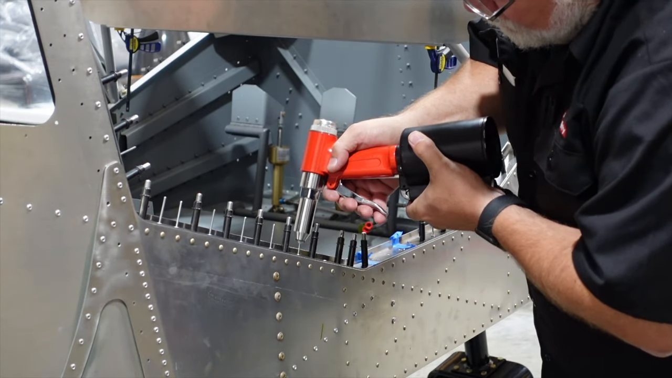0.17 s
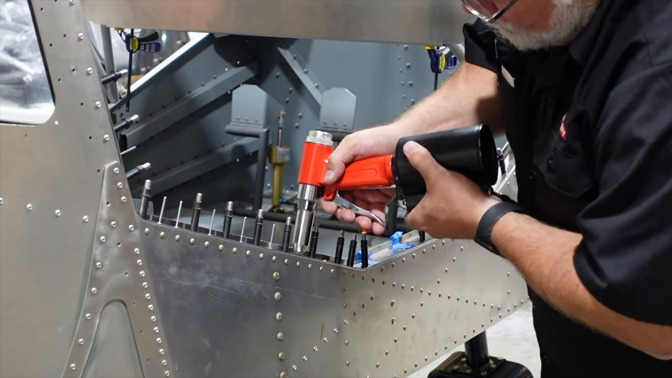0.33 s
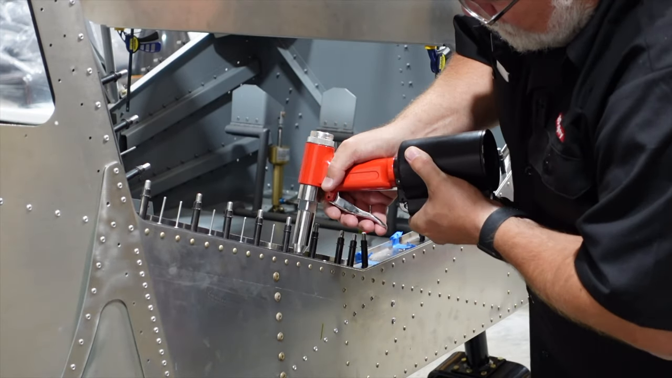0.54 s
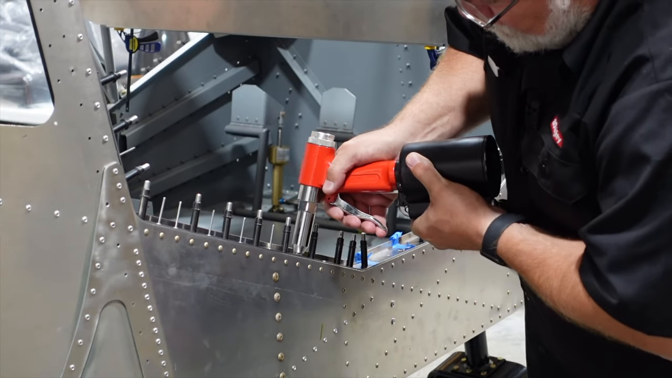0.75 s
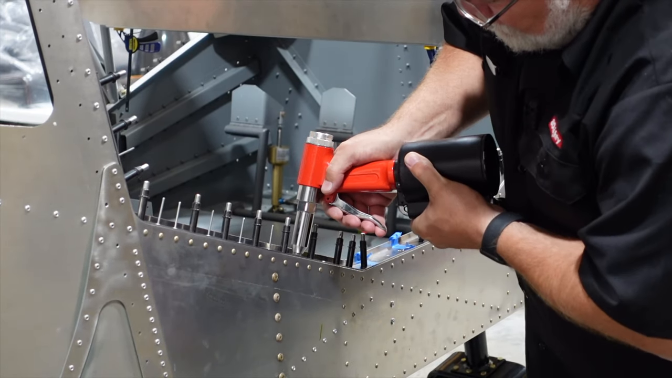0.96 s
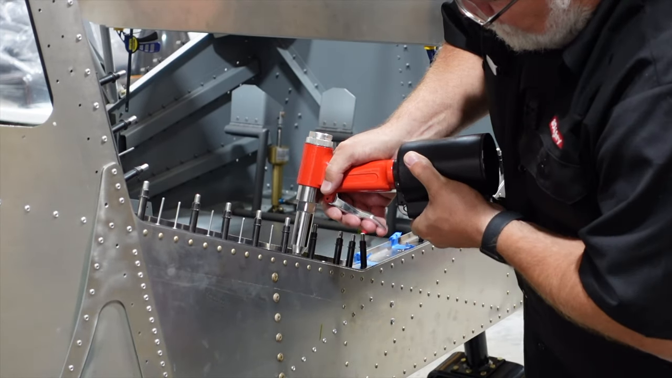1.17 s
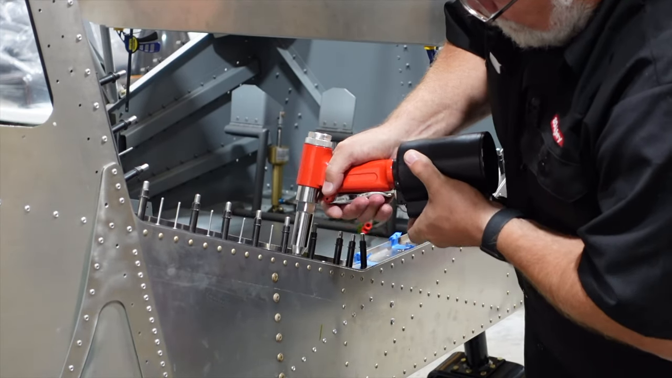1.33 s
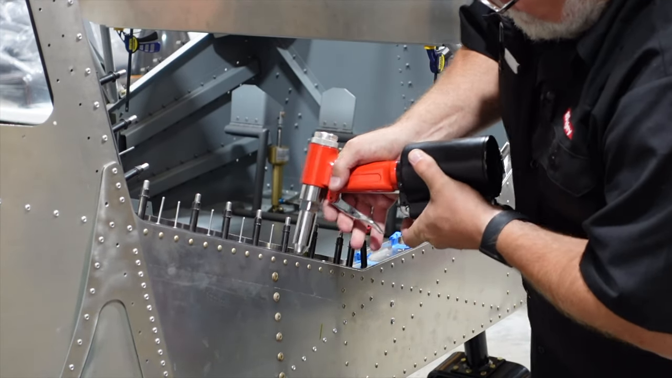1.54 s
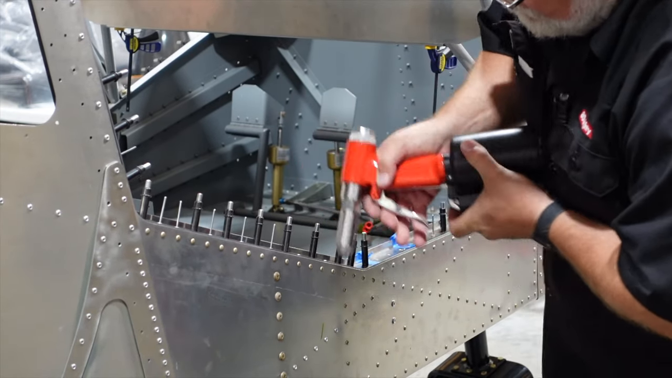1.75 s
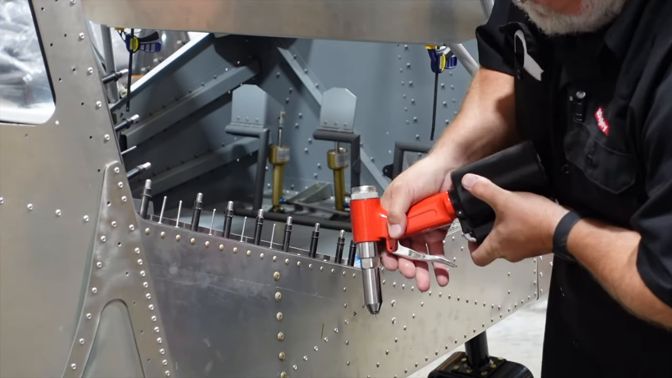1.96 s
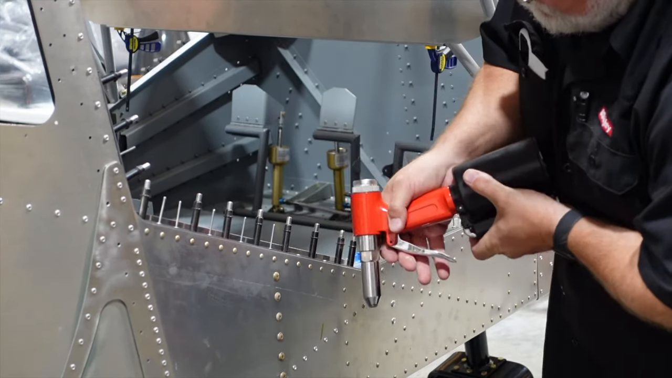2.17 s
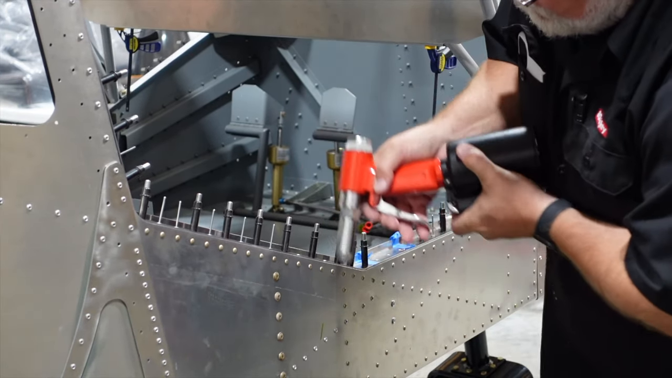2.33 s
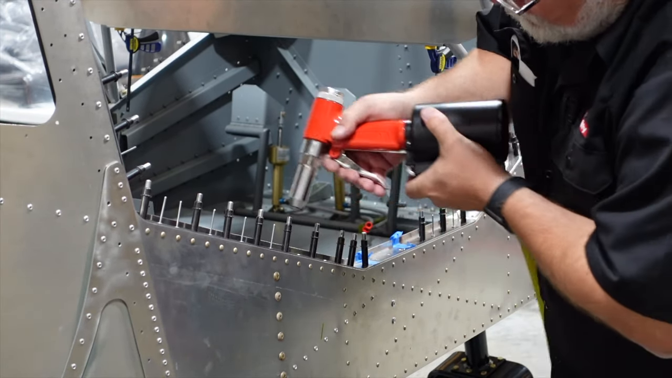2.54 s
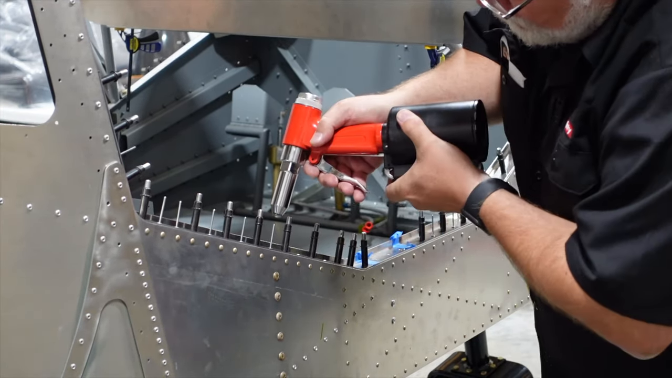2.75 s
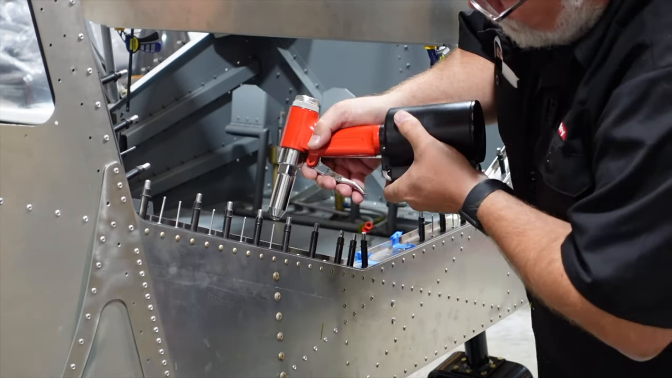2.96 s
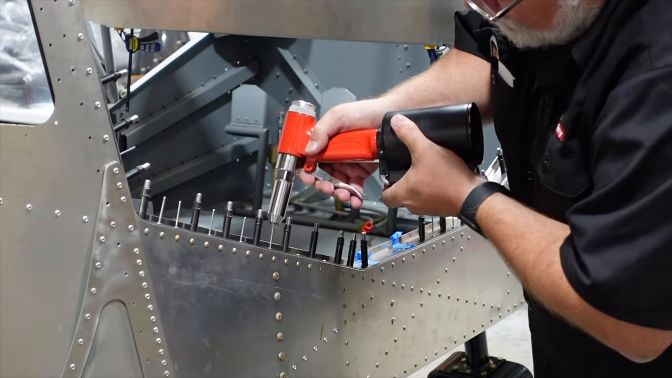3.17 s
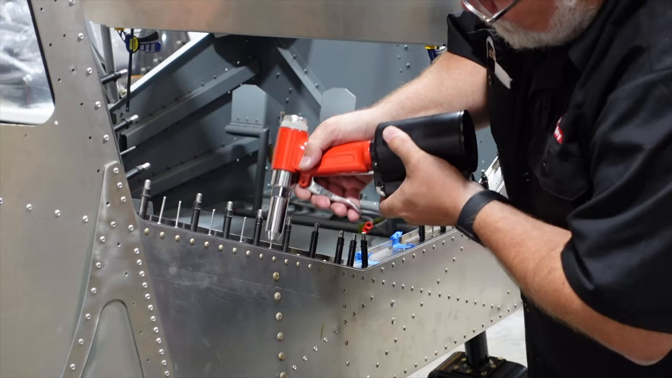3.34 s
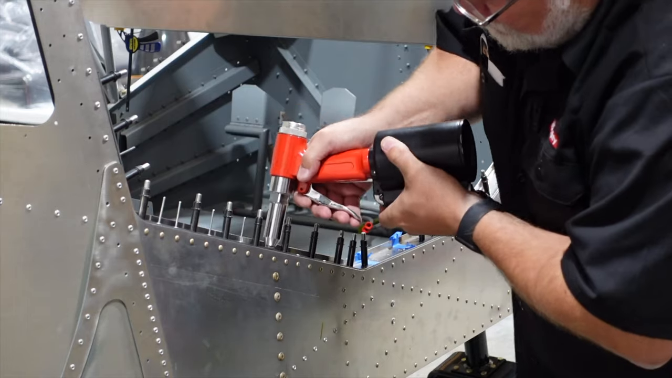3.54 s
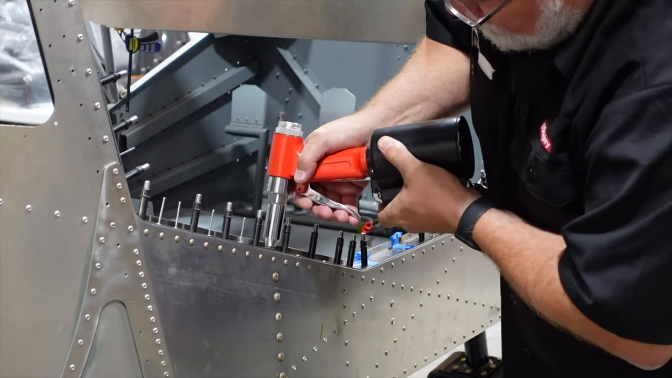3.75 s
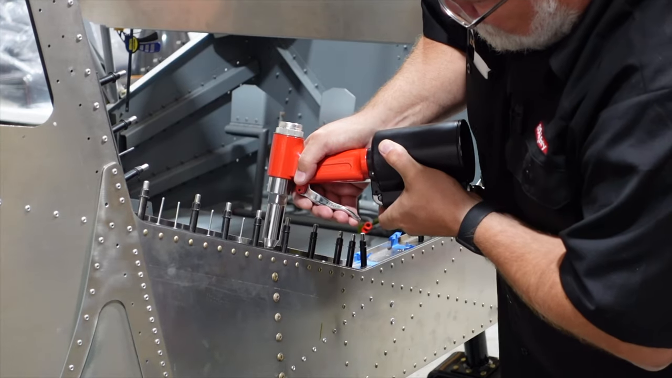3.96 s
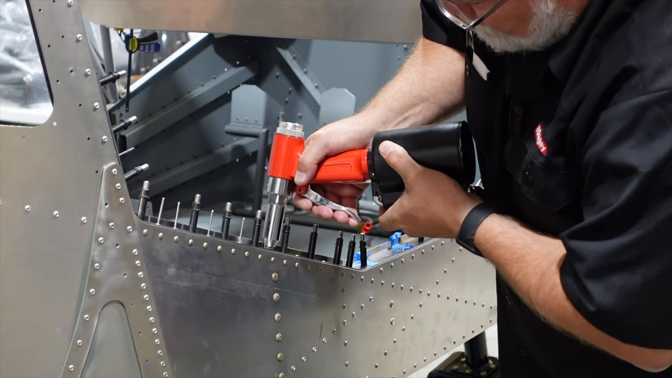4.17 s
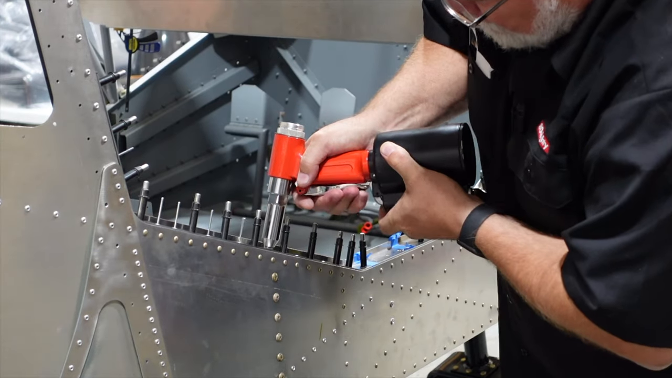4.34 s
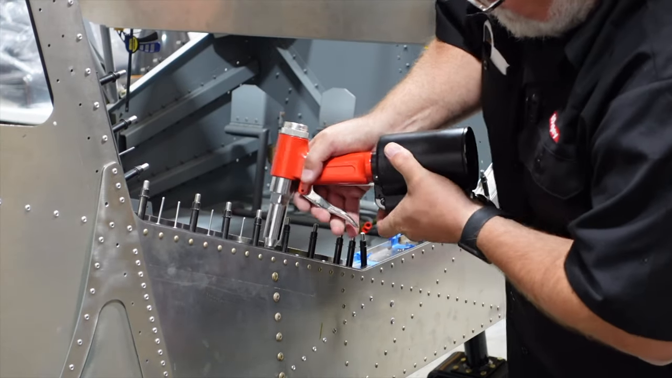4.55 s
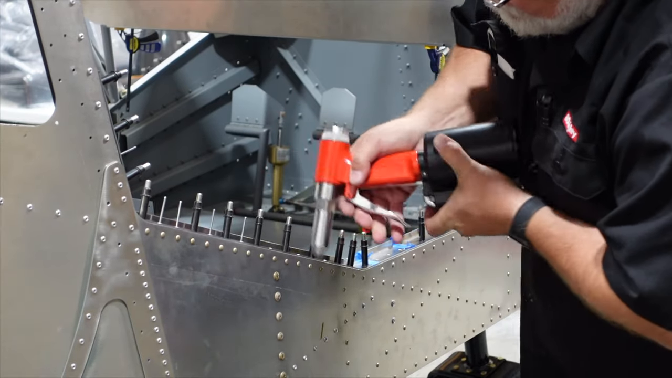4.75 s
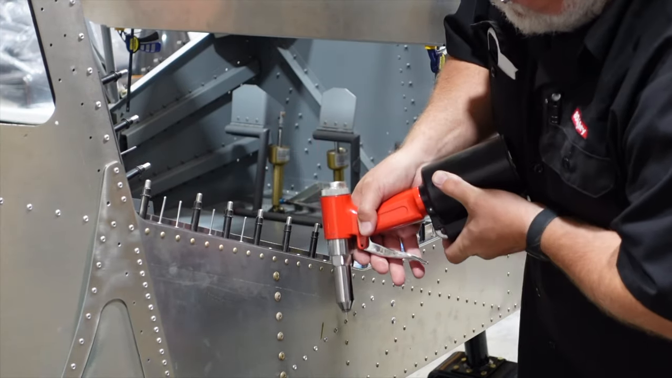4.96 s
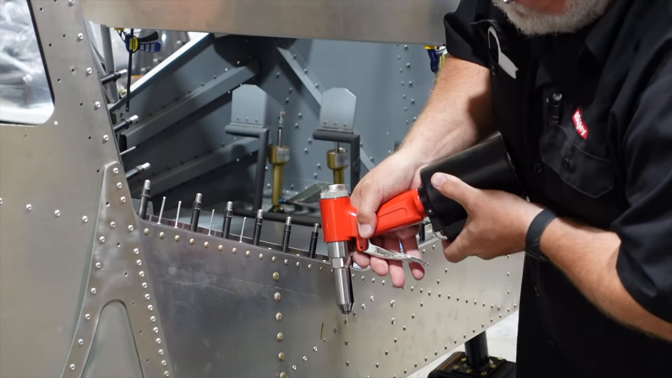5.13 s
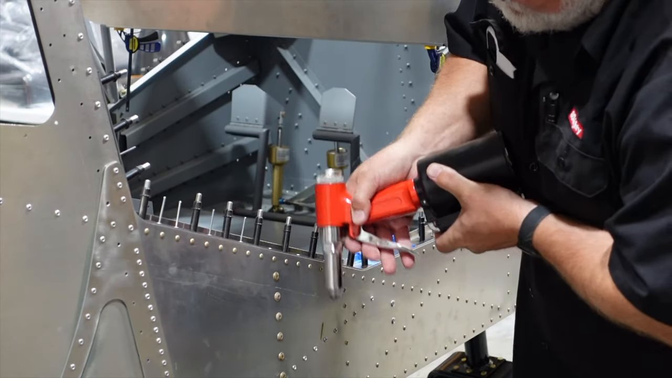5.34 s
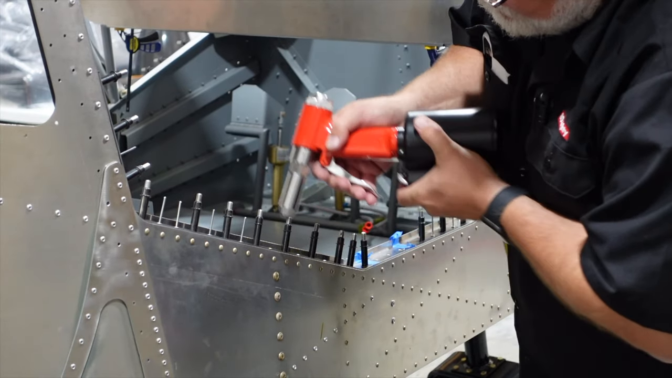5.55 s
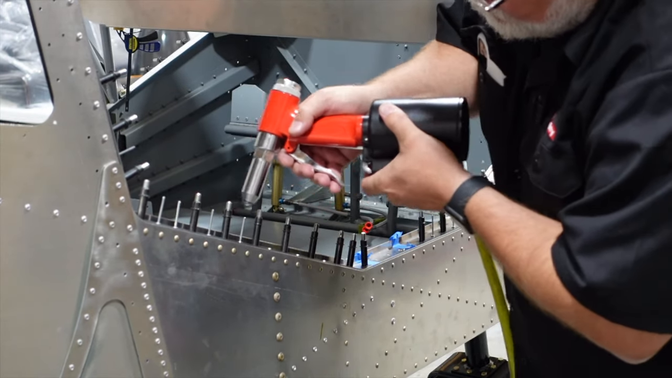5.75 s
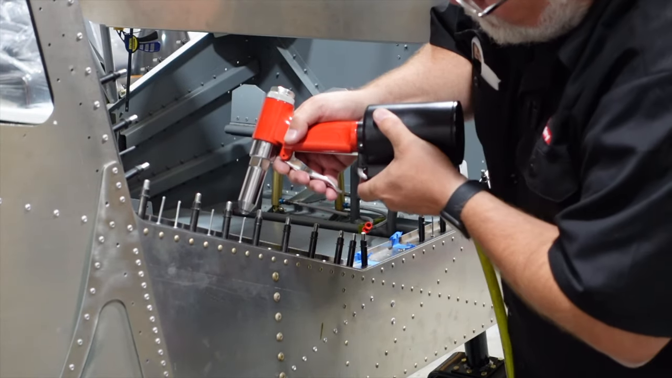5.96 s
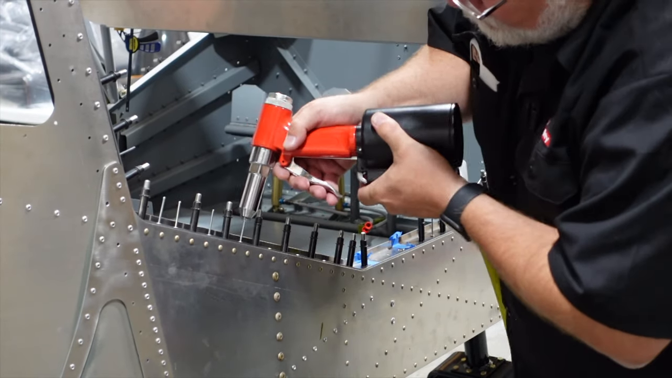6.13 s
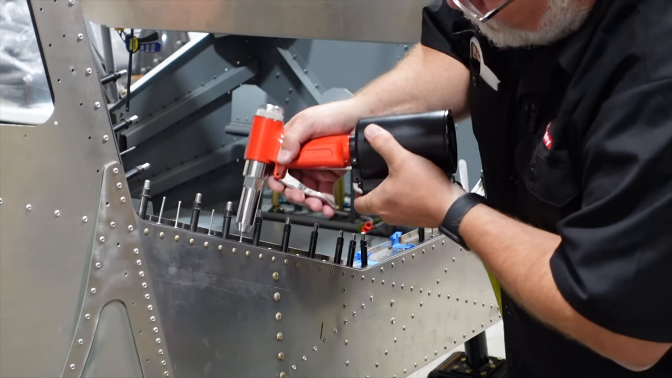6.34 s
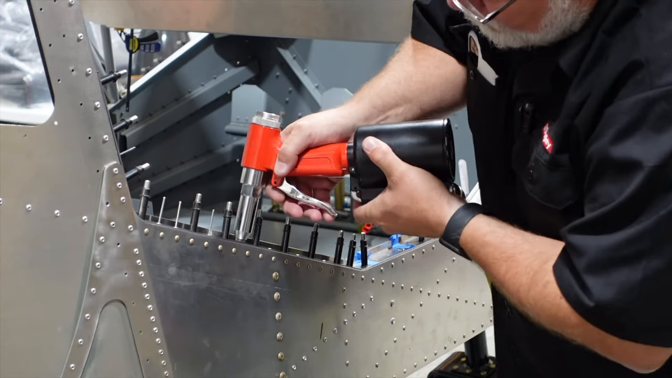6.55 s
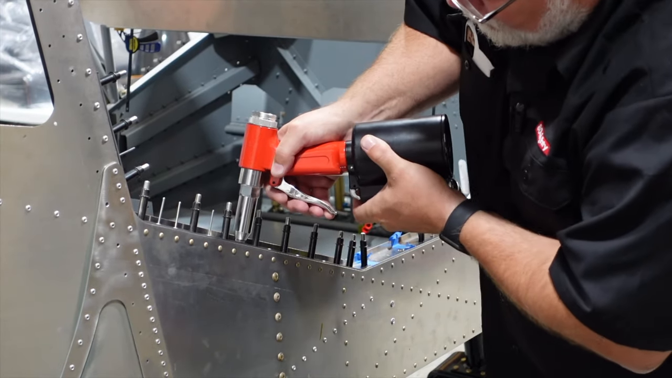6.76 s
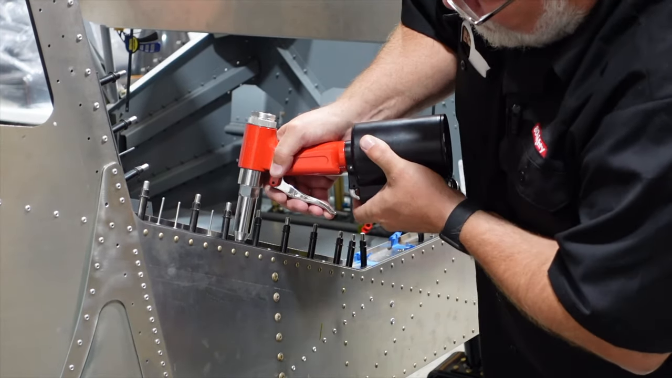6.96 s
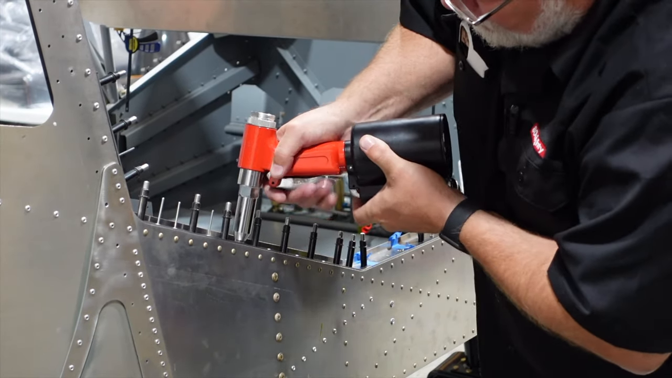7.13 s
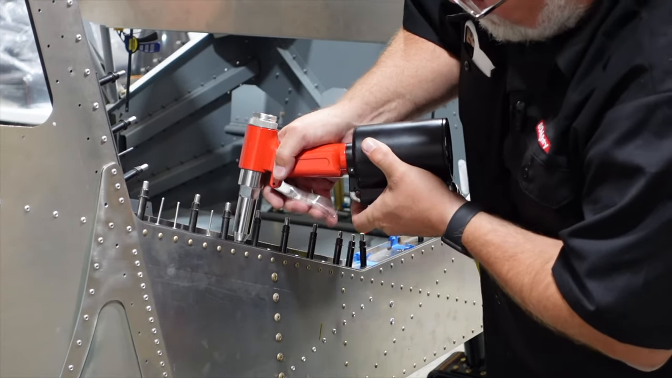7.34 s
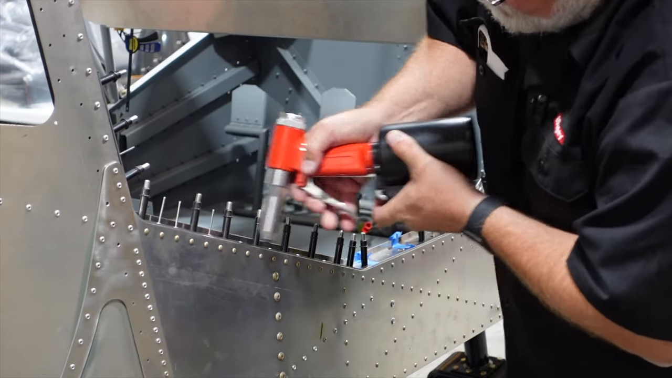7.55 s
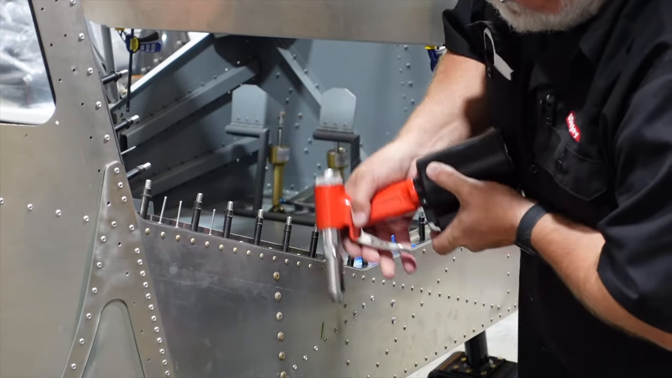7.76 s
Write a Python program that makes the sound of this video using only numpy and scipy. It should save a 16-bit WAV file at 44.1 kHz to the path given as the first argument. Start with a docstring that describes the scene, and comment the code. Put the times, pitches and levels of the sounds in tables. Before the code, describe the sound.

A quiet large workshop, low rumble and a barely audible thin air leak, heard close to the work. At 0.1 s a steel nose touches aluminium, scrapes briefly and knocks at 0.36 s. At 1.25 s a lever clacks softly, air rushes in, and at 1.33 s the stem breaks with a very loud crack; the skin booms and rings. At 1.45 s a bright exhaust jet bursts out, thinning into a swirling hiss that stops with a dry click near 2.1 s. Hands rub softly; thin pins tinkle at 2.5-3.0 s. Touch and slide at 3.2 s, a firmer knock at 3.44 s. The second snap comes at 4.37 s, a slightly duller exhaust at 4.5 s, click at 5.15 s. Tinkles and ticks follow from 5.4 to 6.5 s, with a longer scrape at 6.1 s and knock at 6.47 s. Third snap at 7.24 s, exhaust at 7.38 s, hiss dying towards 8 s.

```python
"""In a large workshop, over a low rumble and a faint air leak, a pneumatic puller sets three blind rivets in an airframe.
The steel nose touches down, slides over the aluminium skin and knocks onto each rivet: shaped noise and ringing modes.
Each pull is a lever clack, a rush of air, a stem snap that rings the skin, an exhaust jet, a return hiss and a dry click.
Then the hands rub on the carried tool, loose parts tick, and spent stems tinkle as beating modes.
Nearby panels give short reflections, and a decaying noise tail gives the echo of the hall."""
import sys
import numpy as np
from scipy import signal
from scipy.fft import rfft, irfft
from scipy.io import wavfile

SR = 44100
rng = np.random.default_rng(int(sys.argv[2]) if len(sys.argv) > 2 else 0)


def unload_audio(sound):
    """Save the sound as a 16-bit wav file, at the path given as the first command line argument."""
    columns = np.transpose(np.atleast_2d(sound))
    # keep every value between -1 and 1, then stretch to whole-number steps
    steps = np.round(np.clip(columns, -1, 1) * 32767)
    wavfile.write(sys.argv[1], SR, steps.astype(np.int16))


N = 348390
# time axis of one event, in seconds
T = np.arange(2 ** 16) / SR

# Event levels are set ahead of the mix; spectrum and mode levels are relative within their source.
# one rivet pull per row: [trigger t/s, snap t/s, release t/s, piston home t/s,
#  exhaust treble level/dB, return flow level/dB, piston stop level/dB]
PULLS = [(1.260, 1.3303, 1.446, 2.085, 2, -48, -35), (4.299, 4.3683, 4.506, 5.158, -2, -45, -30),
         (7.171, 7.2443, 7.384, 8.030, 0, -44.5, -35)]
# the nose meets rivet and skin: [t/s, level/dB, skin boom level/dB, contact t60/s]
KNOCKS = [(0.118, -47, -10.5, 0.038), (0.364, -38.5, 3.5, 0.066), (3.194, -58.5, -17, 0.037),
          (3.441, -28, 1, .089), (6.107, -47, -10.5, 0.25), (6.468, -36.5, -1, .11)]
# the nose slides from touchdown until it drops onto the stem: [start t/s, length/s, level/dB, skin drone level/dB]
SLIDES = [(0.12, 0.22, -64.5, 11), (3.197, 0.23, -70.5, -9), (6.108, 0.368, -67, -1)]
# spent stems bounce: [t/s, pitch f/Hz, ring level/dB, t60/s, tick level/dB]
TINKLES = [(2.517, 6410, -68, .4, -65), (2.865, 6410, -72, .45, -73), (2.989, 6410, -72, .65, -74),
           (5.433, 8500, -65, .05, -76), (5.486, 8350, -64, .05, -74), (5.636, 6290, -64, .4, -57),
           (5.914, 6290, -70, .45, -70), (6.525, 8350, -57, .04, -72)]
# loose parts of the tool tick as it is moved: [t/s, centre f/Hz, level/dB]
TICKS = [(2.803, 2900, -59), (3.281, 3600, -65), (6.005, 900, -57)]

# modes of the riveted skin: [f/Hz, level/dB, t60/s]
SKIN_MODES = [(57.5, -15.5, 2.2), (82.7, -12, 1.6), (96.5, -13, 2.2), (159.4, 4, .6), (173.6, -4, 0.99),
              (197, -2, 0.45), (240, -2.5, 0.6), (285.4, 2, 0.63), (282.4, -8, 0.21), (421, -8.5, 0.78),
              (492, -8, 0.72), (582.6, -2, 0.4), (622, -0.5, 0.35), (643, 4, 0.2), (918, -1.5, 0.4),
              (1087, -5, 0.64), (1285, -3, 0.37), (1332, -6.5, 0.39), (1406, -7.5, 0.54)]
# modes of the steel nosepiece: [f/Hz, level/dB, t60/s]
NOSE_MODES = [(598, 0, .14), (899, -4, .14), (1300, 0, .22), (1870, -7, .18), (2330, -5, .15),
              (2900, -6, .18), (3500, -5, .2), (3780, -4, .3), (4520, -9, .18)]
# decay of the skin's countless finer modes: [f/Hz, t60/s]
SKIN_DECAY = [(100, 0.91), (260, .6), (700, 0.3), (1500, 0.48), (4000, 0.47), (12000, .22)]
# decay of the exhaust jet: [f/Hz, t60/s]
JET_DECAY = [(1000, 0.6), (3000, 1.0), (11000, 0.5)]
# resonances of the exhaust port: [f/Hz, width/Hz, level/dB]
PORT = [(2220, 250, -10), (3380, 110, -1), (3680, 180, -12), (10100, 200, -18), (11900, 300, -18)]
# whistles of the leaking air coupling: [f/Hz, width/Hz, level/dB]
LEAK = [(8830, 50, -94.5), (10300, 60, -101), (13080, 60, -100)]

# noise of the workshop: [f/Hz, level/dB]
SHOP = [(20, -26), (36, -12), (59, 1), (120, -6), (196, -23), (315, -35), (700, -36.5), (1400, -36),
        (2200, -43), (5000, -47.5), (9000, -51), (15500, -58.5)]
# scrape of the nose in a knock: [f/Hz, level/dB]
KNOCK = [(100, -14), (250, -4), (600, 5), (850, 1), (1300, 0.5), (1900, -5.5), (3800, -4), (5500, -18),
         (9000, -22.5), (15000, -29)]
# airframe boom behind a knock: [f/Hz, level/dB]
BOOM = [(70, -25), (140, -0.5), (260, 4.5), (380, -11), (600, -12.5), (1300, -15.5), (2000, -21),
        (3200, -24), (3800, -22.5), (5200, -30), (12000, -58.5)]
# skin modes under a knock; a light touch hardly moves the slowest: [f/Hz, level/dB]
KNOCK_SKIN = [(160, -12), (245, 2.5), (300, -0.5), (420, -10)]
# metal sliding on metal: [f/Hz, level/dB]
RUB = [(80, -10), (180, 4.5), (400, 0.5), (1300, -3), (1650, -6.5), (2100, -3), (2900, -9.5), (3850, -3.5),
       (5500, -21), (15000, -27)]
# skin droning under the slide: [f/Hz, level/dB]
DRONE = [(80, -25.5), (160, 0.5), (260, -3), (400, -21.5), (1000, -45), (4000, -70)]
# air rushing into the cylinder: [f/Hz, level/dB]
INTAKE = [(70, -10.5), (170, 11), (400, 1.5), (650, 0), (1000, -6.5), (2600, -2), (3600, -3), (5200, -10.5),
          (9000, -14.5), (11000, -11.5), (16000, -20)]
# skin modes as the jaws bite: [f/Hz, level/dB]
BITE = [(500, 0.0), (640, 2.5), (1100, -8.0)]
# crack of the breaking stem: [f/Hz, level/dB]
CRACK = [(150, -14), (600, -5), (1300, 0), (2300, -4), (4000, -11.5), (6500, -21), (15000, -26)]
# shudder of the skin: [f/Hz, level/dB]
SKIN = [(70, -32.5), (130, -4), (250, 0), (420, -7.5), (650, -1.5), (800, -8.5), (1350, -3), (1700, -13.5),
        (2500, -18), (3600, -14.5), (5200, -26), (15000, -31.5)]
# stem shooting up the barrel: [f/Hz, level/dB]
STEM = [(1000, -17.5), (3500, -0.5), (7000, -3), (12000, -0.5), (16000, -8)]
# exhaust jet: [f/Hz, level/dB]
EXHAUST = [(300, -15), (800, -6), (1500, -5.5), (2150, 0.5), (2700, -5.5), (3600, -1), (4800, -4.5),
           (6000, -5.5), (7500, -7.5), (10700, -2.5), (13000, -4), (16000, -10)]
# air pushed out by the returning piston: [f/Hz, level/dB]
RETURN = [(300, -14.5), (1100, -23.5), (1500, -4), (2100, -2), (2700, -3), (3400, 2.5), (4300, -5.5),
          (6000, -11.5), (8300, -19.5), (10500, -12.5), (13500, -21), (16000, -21)]
# thin hiss late in the return: [f/Hz, level/dB]
RETURN_HISS = [(8000, -22), (10500, 13), (12000, 1), (14000, 7), (16000, -18)]
# click of the piston stop: [f/Hz, level/dB]
PISTON_CLICK = [(200, -21), (450, -5.5), (1200, -3.5), (2000, 2.5), (3800, 9.5), (6000, -32), (14000, -17)]
# hands rubbing on the tool: [f/Hz, level/dB]
HANDS = [(80, 0), (180, 6.5), (400, 1.5), (1000, -4), (2000, -11), (4000, -16), (6000, -20), (15000, -26)]
# tick of a thin steel pin: [f/Hz, level/dB]
PIN_TICK = [(2000, -13), (6000, -8), (14000, -6), (16000, -4)]

# reflections from nearby airframe panels: [delay t/s, level/dB]
PANELS = [(.0016, -32), (.0041, -22), (.0073, -20.5), (0.0107, -17.5)]
# decay of the workshop's echo: [f/Hz, t60/s]
HALL_DECAY = [(80, 5), (200, 2.07), (500, 1.47), (1500, 1.24), (3500, 0.7043), (7000, 0.7935),
              (14000, 0.58)]
# colour of the workshop's echo: [f/Hz, level/dB]
HALL_COLOUR = [(60, -12), (200, -15), (600, -19), (1500, -17), (3500, -5), (7000, -5), (15000, -12)]

SHOP_DB = -60.5
# the same air pressure drives every pull
INTAKE_DB, SNAP_DB, EXHAUST_DB = -26, 0, -13
# the trigger lever clacks just before the valve opens
LEVER_LEAD_S, LEVER_DB, LEVER_BOOM_DB, LEVER_RING_S = 0.015, -50.5, 7.5, 0.058
# after each knock the nose rebounds once, this much softer
REBOUND_S, REBOUND_DB, REBOUND_CONTACT_S = .019, -6.5, .035
# the hand presses harder towards the end of a slide
SLIDE_SWELL_DB, SLIDE_RELEASE_S = 7, .04
# the tool is swung to the next rivet: swell peak after piston home, time from peak to 1/e, level
CARRY_DELAY_S, CARRY_WIDTH_S, CARRY_DB = .57, .25, -71
# width of each of the two resonators a tick passes through, and its t60
TICK_WIDTH_HZ, TICK_RING_S = 1100, 0.037
TOP_HZ = 15850


def undb(db):
    """Decibels to gain."""
    return 10 ** (np.asarray(db) / 20)


def read(points, hz):
    """Value of a table on a log-frequency axis."""
    f, value = np.transpose(points)
    return np.interp(np.log(np.maximum(hz, 1)), np.log(f), value)


def colour(x, spectrum):
    """Filter x with a gain curve over frequency."""
    gain = undb(read(spectrum, np.fft.rfftfreq(len(x), 1 / SR)))
    return irfft(rfft(x) * gain, len(x))


def noise(spectrum, size=len(T)):
    """Coloured noise, rms 1."""
    x = colour(rng.standard_normal(size), spectrum)
    return x / x.std()


def whistle(hz, width_hz, size=len(T)):
    """Turbulence in one narrow resonance, rms 1."""
    x = signal.lfilter(*signal.iirpeak(hz, hz / width_hz, fs=SR), rng.standard_normal(size))
    return x / x.std()


def fade(t60):
    """Exponential decay, 60 dB down after t60 seconds."""
    return np.exp(-np.log(1000) * T / max(t60, 1e-4))


def ramp(start, length):
    """A straight rise from 0 to 1."""
    return np.clip((T - start) / max(length, 1e-4), 0, 1)


def die_away(x, decay):
    """Each octave of x fades in its own time."""
    octave = np.clip(np.log2(np.fft.rfftfreq(len(x), 1 / SR) / 62.5 + 1e-9), 0, 8)
    spectrum = rfft(x)
    out = 0
    for k in range(9):
        # neighbouring octave bands crossfade
        band = irfft(spectrum * np.maximum(1 - abs(octave - k), 0))
        out = out + band * fade(read(decay, 62.5 * 2 ** k))
    return out


def ring(modes):
    """Struck modes; each blow lands on another spot and weights them a little differently."""
    spot = undb(rng.standard_normal(len(modes)))
    out = 0
    for k, (hz, db, t60) in enumerate(modes):
        # alternate modes start in opposite directions
        out = out + (-1) ** k * spot[k] * undb(db) * np.sin(2 * np.pi * hz * T) * fade(t60)
    return out


def add(out, s, x):
    """Mix x into out from time s."""
    i = min(int(s * SR), N)
    out[i:i + len(x)] += x[:N - i]


def background():
    """The workshop's low rumble and the faint whistle of the leaking air coupling."""
    leak = sum(undb(db) * whistle(hz, width_hz, size=N) for hz, width_hz, db in LEAK)
    return undb(SHOP_DB) * noise(SHOP, size=N) + leak


def knock(boom_db, length):
    """The steel nose scrapes briefly onto the rivet and rings; the airframe booms behind it."""
    contact = noise(KNOCK) * fade(length) + undb(-20.5) * ring(NOSE_MODES)
    skin = colour(ring(SKIN_MODES), KNOCK_SKIN)
    boom = die_away(noise(BOOM), SKIN_DECAY) + undb(-5.5) * skin
    # the airframe boom against the contact: a fixed -4 dB plus its own level
    return contact * ramp(0, 0.004) + undb(boom_db - 4) * boom * ramp(0, 0.0084)


def rubbing(spectrum):
    """One surface slides on another in uneven little slips under a wandering grip."""
    slips = rng.standard_normal(len(T)) * undb(2.4 * np.minimum(rng.exponential(size=len(T)), 8))
    # the grip takes a new random level 50 times a second
    moments = T[::SR // 50]
    grip = undb(2 * np.interp(T, moments, rng.standard_normal(len(moments))))
    rub = colour(slips, spectrum)
    return rub / rub.std() * grip


def slide(length, drone_db):
    """The nose is dragged over the skin under growing pressure, and stops as it finds the stem."""
    swell = undb(SLIDE_SWELL_DB * (ramp(0, length) - 1))
    pressure = swell * ramp(0, .01) * (1 - ramp(length, SLIDE_RELEASE_S))
    return (rubbing(RUB) + undb(drone_db) * noise(DRONE)) * pressure


def lever_clack():
    """The trigger lever clacks: a soft knock with its own boom of the airframe."""
    return undb(LEVER_DB) * knock(LEVER_BOOM_DB, LEVER_RING_S)


def intake(until):
    """Air rushes into the cylinder until the stem breaks; the jaws bite and tug the skin."""
    valve = ramp(0, .009) * (1 - ramp(until, .09))
    bite = colour(ring(SKIN_MODES), BITE) * fade(0.14) * ramp(0, .004)
    # the tug comes 7 ms after the valve opens
    tug = np.interp(T - .007, T, bite, left=0)
    return undb(-1) * noise(INTAKE) * valve + undb(0.5) * tug


def snap():
    """The stem breaks: a hard crack, the skin shudders, the stem shoots up the barrel."""
    crack = undb(-2.5) * noise(CRACK) * ramp(0, 0.00073) * (1 - ramp(0.00069, 0.0049))
    shudder = undb(-12) * die_away(noise(SKIN), SKIN_DECAY) * ramp(0, 0.0089)
    stem = undb(-22) * noise(STEM) * ramp(0, 0.0047) * (1 - ramp(0.021, 0.0088))
    return crack + shudder + stem


def spring_back():
    """Freed from the pull, the skin swings in its strong modes."""
    return undb(-22.0) * ring(SKIN_MODES) * ramp(0, 0.018)


def port():
    """Air sings in the resonances of the exhaust port."""
    return sum(undb(db) * whistle(hz, width_hz) for hz, width_hz, db in PORT)


def exhaust(treble_db):
    """The valve opens and the cylinder's pressure falls away; the jet dulls as it slows."""
    jet = colour(noise(EXHAUST) + undb(-15) * port(), [(3000, 0.0049), (11000, treble_db)])
    return die_away(jet, JET_DECAY) * ramp(.001, 0.0053) * (1 - ramp(0.21, 0.13))


def return_flow(until):
    """The returning piston pushes the last air through the port; a thin hiss swells about three quarters through."""
    air = undb(-0.5) * noise(RETURN)
    song = undb(-7) * port()
    # the flow falls by 26 dB a second
    flow = ramp(0.05, .15) * undb(-26 * (T - .5))
    swell = np.exp(-((T - .47) / .08) ** 2)
    hiss = noise(RETURN_HISS) * swell
    return ((air + song) * flow + undb(-8.5) * hiss) * (1 - ramp(until, 0.013))


def lift_away(x):
    """The tool is lifted off the skin, so the jet's reflection lags more and more and the hiss swirls."""
    lag = .0003 + .0022 * T
    reflection = undb(-13) * np.interp(T - lag, T, x, left=0)
    return x + reflection


def piston_stop():
    """The piston comes home with a short, dry click."""
    return noise(PISTON_CLICK) * ramp(0, .003) * (1 - ramp(.004, .004))


def carry():
    """Handling noise of hands on the tool swells and fades with its swing."""
    return undb(CARRY_DB) * rubbing(HANDS) * np.exp(-((T - CARRY_DELAY_S) / CARRY_WIDTH_S) ** 2)


def tinkle(hz, ring_db, t60, tick_db):
    """A thin steel pin ticks and rings; its close bending modes beat."""
    twins = [(hz, -2, t60), (hz + 13, -6, t60), (hz - 47, -6, t60 / 2), (hz + 81, -8, t60 / 2)]
    pin = undb(ring_db) * ring(twins) * ramp(0, 0.0012)
    return pin + undb(tick_db) * noise(PIN_TICK) * fade(0.065)


def tick(hz):
    """A loose part taps once, in one broad resonance."""
    body = signal.lfilter(*signal.iirpeak(hz, hz / TICK_WIDTH_HZ, fs=SR), whistle(hz, TICK_WIDTH_HZ))
    return body / body.std() * ramp(0, 0.0018) * fade(TICK_RING_S)


def panels(x):
    """Small panels close by reflect the middle and treble; the bass bends round them."""
    bright = signal.sosfilt(signal.butter(2, 700, "high", fs=SR, output="sos"), x)
    out = np.zeros(N)
    for delay, db in PANELS:
        add(out, delay, undb(db) * bright)
    return out


def hall(x):
    """Diffuse echo of the workshop, longest in the bass."""
    white = rng.standard_normal(len(T))
    echo = die_away(colour(white, HALL_COLOUR), HALL_DECAY) * ramp(0.0051, 0.011) / np.sqrt(SR / 20)
    return signal.fftconvolve(x, echo)[:N]


def scene():
    """Three pulls and the handling around them; the skin's spring-back and the tinkles stay dry."""
    out, close = np.zeros(N), np.zeros(N)
    for s, db, boom_db, length in KNOCKS:
        add(out, s, undb(db) * knock(boom_db, length))
        add(out, s + REBOUND_S, undb(db + REBOUND_DB) * knock(boom_db, REBOUND_CONTACT_S))
    for s, length, db, drone_db in SLIDES:
        add(out, s, undb(db) * slide(length, drone_db))
    for trigger, broken, release, home, treble_db, return_db, stop_db in PULLS:
        add(out, trigger - LEVER_LEAD_S, lever_clack())
        add(out, trigger, undb(INTAKE_DB) * intake(broken - trigger))
        add(out, broken, undb(SNAP_DB) * snap())
        add(close, broken, undb(SNAP_DB) * spring_back())
        jet = undb(EXHAUST_DB) * exhaust(treble_db)
        last_air = undb(return_db) * return_flow(home - release)
        add(out, release, lift_away(jet + last_air))
        # the click begins 5 ms before the piston is fully home
        add(out, home - .005, undb(stop_db) * piston_stop())
        add(out, home, carry())
    for s, hz, ring_db, t60, tick_db in TINKLES:
        add(close, s, tinkle(hz, ring_db, t60, tick_db))
    for s, hz, db in TICKS:
        add(out, s, undb(db) * tick(hz))
    near = undb(-1.1) * (out + panels(out))
    return (close + near + hall(near) + background())[None]


def record(dry):
    """Soft saturation rounds the highest peaks; a steep low-pass cuts the top."""
    rounded = dry / (1 + (dry / .95) ** 4) ** .25
    return signal.sosfilt(signal.ellip(10, .2, 80, TOP_HZ, fs=SR, output="sos"), rounded)


dry = scene()
out = record(dry)
unload_audio(out)
```